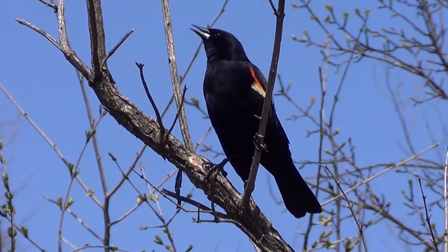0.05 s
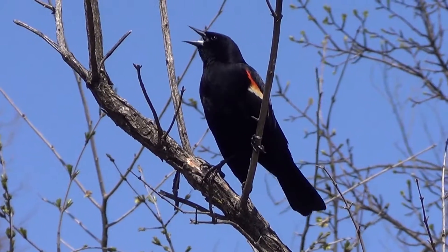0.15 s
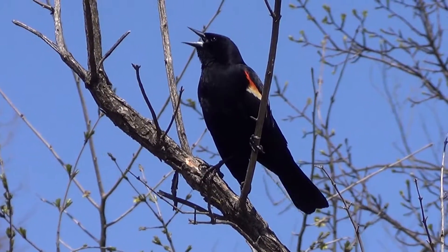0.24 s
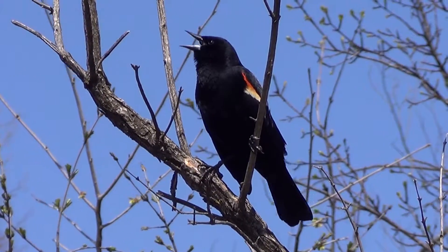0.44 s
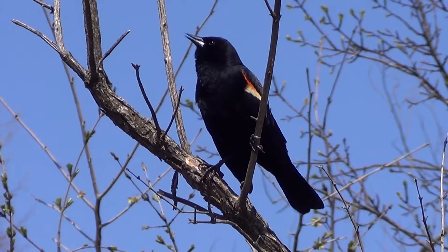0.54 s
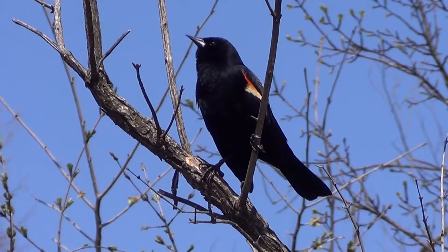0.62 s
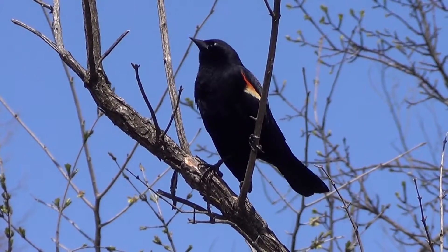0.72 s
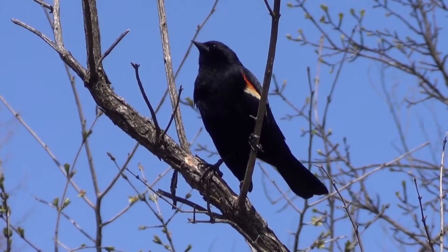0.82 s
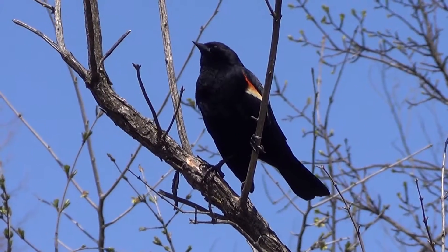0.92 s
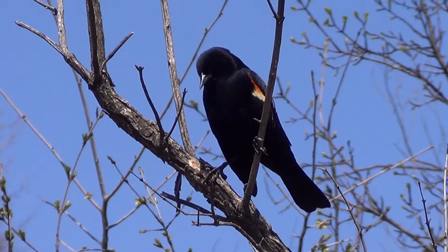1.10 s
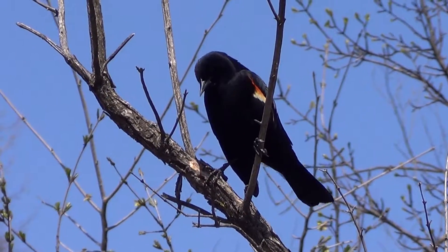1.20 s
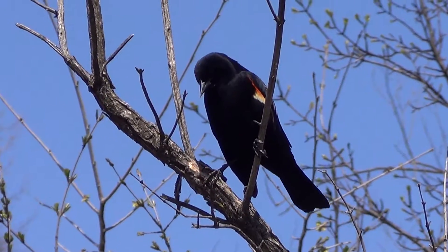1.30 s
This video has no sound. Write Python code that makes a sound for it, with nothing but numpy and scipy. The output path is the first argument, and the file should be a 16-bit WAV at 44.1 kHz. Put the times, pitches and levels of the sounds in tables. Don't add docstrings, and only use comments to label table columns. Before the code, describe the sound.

A faint far bird whistle fades over quiet wind and distant traffic hum. At about 0.17 seconds a close blackbird calls loudly: a very high, buzzing note swoops down, then at 0.32 a lower note starts rough, falls, and clears into a bright, slightly rising whistle ending near 0.58. A short echo lingers among trees; from 0.9 to 1.35 faint distant birds peep, trill and whistle.

```python
import sys
import numpy as np
from scipy import signal
from scipy.io import wavfile
from scipy.ndimage import uniform_filter1d

SR = 44100
rng = np.random.default_rng(int(sys.argv[2]) if len(sys.argv) > 2 else 0)


def ratio_of_db(decibels):
    return 10 ** (np.asarray(decibels, float) / 20)


def generate_wav(sig):
    pcm = np.round(np.clip(np.atleast_2d(sig).T, -1, 1) * 32767).astype(np.int16)
    wavfile.write(sys.argv[1], SR, pcm)


N = 59535


def evened(x):
    return x / np.sqrt(np.mean(x ** 2) + 1e-20)


def sine(hz):
    return np.sqrt(2) * np.sin(2 * np.pi * np.cumsum(hz * np.ones(N)) / SR)


def fuzzy(hz, width):
    r = np.exp(-np.pi * width / SR)
    z = rng.standard_normal(N) + 1j * rng.standard_normal(N)
    for _ in range(2):
        z = signal.lfilter([1], [1, -r], z)
    carrier = np.exp(2j * np.pi * np.cumsum(hz * np.ones(N)) / SR)
    return evened((z * carrier).real)


def read(points, hz):
    f, value = np.transpose(points)
    return np.interp(np.log(hz + 1), np.log(f + 1), value)


# (frequency [Hz], level [dB per Hz])
AIR_SPECTRUM = [(25, -33), (75, -5.5), (200, 0.5), (300, -4), (850, 0), (2000, -8.5), (3000, -16),
                (6500, -25), (15000, -32.5)]
# (frequency [Hz], correlation [0-1])
LIKENESS = [(60, 0.96), (180, 1), (550, 0.89), (1650, 0.69), (4970, 0.5), (15000, 1)]


def air():
    wash_db, whine_hz, whine_db = -39.5, 15734, -61
    hum_hz, hum_width_hz, hum_db, hum_steady = 119.8, 17, -56, 2.53
    frames, hz = N // 256 + 5, np.fft.rfftfreq(1024, 1 / SR)
    a, b, c, d, patches = rng.standard_normal((frames, 513, 5)).T
    patches = evened(uniform_filter1d(uniform_filter1d(patches, 10, 0), 12, 1))
    same = np.clip(read(LIKENESS, hz), -1, 1)[:, None]
    left = a + 1j * b
    right = same * left + np.sqrt(1 - same ** 2) * (c + 1j * d)
    z = np.array([left, right]) * ratio_of_db(read(AIR_SPECTRUM, hz)[:, None] + patches)
    wash = ratio_of_db(wash_db) * evened(signal.istft(z, nperseg=1024, noverlap=768)[1][:, :N])
    t = np.arange(N) / SR
    whine = ratio_of_db(whine_db) * np.sqrt(2) * np.sin(2 * np.pi * whine_hz * t)
    steady_hum = hum_steady * np.sin(2 * np.pi * hum_hz * t)
    hum = ratio_of_db(hum_db) * (fuzzy(hum_hz, hum_width_hz) + steady_hum)
    return wash + hum + whine


# (start [s], length [s], pitch [Hz], glide [Hz])
FAR_BIRDS = [
    (0, .32, 4785, -30),
    (1.13, .078, 3370, 0),
    (1.062, .1, 6680, 0),
    (.945, .045, 2750, -100),
    (1.0, .35, 2830, 0),
    (.91, .05, 5150, 0),
    (.94, .04, 3700, 0),
]
FAR_BIRD_LEVELS = [-50.5, -53, -68, -57, -64, -65, -68]
# (centre [s], half length [s], pitch [Hz], width [Hz])
FAR_TRILL = (.95, .045, 3700, 3200)


def distant():
    fade_db, blur_hz, trill_db = -18, 40, -49.5
    t, out = np.arange(N) / SR, np.zeros((2, N))
    for (start, length, pitch, glide), db in zip(FAR_BIRDS, FAR_BIRD_LEVELS):
        u = np.clip((t - start) / length, 0, 1)
        sounding = start == 0
        edges = np.clip(np.minimum(u + sounding, 1 - u) * 8, 0, 1)
        shape = edges * ratio_of_db(db + fade_db * u * sounding)
        hz = pitch + glide * u
        both, clear = fuzzy(hz, blur_hz), sine(hz)
        out += shape * np.array([clear + 1.05 * both, clear + 0.67 * fuzzy(hz, blur_hz)])
    centre, half, hz, width = FAR_TRILL
    return out + ratio_of_db(trill_db) * np.exp(-((t - centre) / half) ** 2) * fuzzy(hz, width)


def drift(size):
    return evened(uniform_filter1d(uniform_filter1d(rng.standard_normal(N), size), size))


def whistle(curve, flutter):
    jitter_hz, shimmer_db = 25, 1.41
    t, (s, *columns) = np.arange(N) / SR, np.transpose(curve)
    hz, level_db, depth, second_db, third_db = (np.interp(t, s, c) for c in columns)
    top, rate, slowing, swing, lead = flutter
    beat = 2 * np.pi * (rate * (t - top) - slowing * (t - top) ** 2 / 2)
    shake = np.cos(beat) + 0.32 * np.sin(2 * beat)
    jitter = jitter_hz * depth / 300 * drift(size=60)
    phase = 2 * np.pi * np.cumsum(hz + depth * shake + jitter) / SR
    throb = 1 + np.clip(swing * depth, 0, .95) * np.cos(beat + lead)
    tone = np.sin(phase)
    for k, db in ((2, second_db), (3, third_db)):
        tone += ratio_of_db(db) * np.sin(k * phase) * (k * hz < 19000)
    shimmer = shimmer_db * drift(size=200) + depth / 250 * drift(size=50)
    return np.sqrt(2) * tone * throb * ratio_of_db(level_db + shimmer) * (t > s[0]) * (t < s[-1])


# (time [s], pitch [Hz], level [dB], flutter depth [Hz], second partial [dB], third partial [dB])
HIGH_CURVE = [
    (.168, 9530, -52, 450, -33, -60),
    (.184, 8730, -35.5, 494, -32.5, -60),
    (.202, 7770, -19.5, 550, -37.5, -60),
    (.230, 6960, -17.5, 420, -30.5, -60),
    (.254, 6650, -13.5, 200, -22.5, -61.5),
    (.284, 6603, -13, 220, -17.5, -60),
    (.291, 6550, -22, 220, -7.5, -60),
    (.310, 6650, -14, 300, -33, -60),
    (.322, 6800, -40, 350, -26, -60),
]
# (one pitch top [s], rate [Hz], slowing [Hz/s], loudness swing [per Hz], lead [rad])
HIGH_BEAT = (.2205, 287, 350, .0007, 1.2)


def high_note():
    return whistle(HIGH_CURVE, HIGH_BEAT)


# (time [s], pitch [Hz], level [dB], flutter depth [Hz], second [dB], third partial [dB])
LOW_BUZZ = [
    (.312, 5300, -51.5, 549, -15, -22.5),
    (.322, 5100, -24.5, 508, -9, -26),
    (.338, 4760, -15, 430, -13, -23),
    (.372, 4463, -12, 258, -10.5, -18),
    (.399, 4325, -9, 90, -14, -10),
]
LOW_CLEAR = [
    (.405, 4327, -12, 5, -38, -15),
    (.438, 4360, -9, 5, -12, -5.5),
    (.468, 4386, -11.5, 5, -9.5, -6),
    (.478, 4414, -4.5, 5, -21, -24),
    (.520, 4443, -7, 5, -38.5, -19.5),
    (.540, 4494, -9.5, 5, -29, -33),
    (.568, 4490, -28, 5, -31, -28),
    (.59, 4540, -60, 5, -32, -30),
]
# (one pitch top [s], rate [Hz], slowing [Hz/s], loudness swing [per Hz], lead [rad])
LOW_BEAT = (.3537, 194, 5, 0.0016, 1.86)


def low_note():
    return whistle(LOW_BUZZ + LOW_CLEAR, LOW_BEAT)


# (multiple of pitch, centre [s], half length [s], width [Hz], level [dB])
RASP_BANDS = [
    (1.5, 0.334, 0.025, 1400, -31),
    (2.5, 0.424, 0.058, 1200, -46.5),
]


def rasp():
    t, (s, pitch) = np.arange(N) / SR, np.transpose(LOW_BUZZ + LOW_CLEAR)[:2]
    hz, out = np.interp(t, s, pitch), np.zeros(N)
    for multiple, centre, half, width, db in RASP_BANDS:
        out += ratio_of_db(db) * np.exp(-((t - centre) / half) ** 2) * fuzzy(multiple * hz, width)
    return out


# (delay [s], left level [dB], right level [dB])
NEAR_ECHOES = [
    (.0021, -21, -26.5),
    (.0046, -14, -13.5),
    (.0083, -7, -15),
    (0.0134, -21.5, -32),
    (.021, -19.5, -17.5),
]


def trees(x):
    leaf_hz = 5560
    taps, t = np.zeros((2, SR)), np.arange(SR) / SR
    at = np.arange(400, SR - 20, 20) + rng.integers(0, 20, (2, (SR - 401) // 20))
    np.put_along_axis(taps, at, rng.choice([-1., 1.], at.shape), 1)
    out = np.zeros((2, SR))
    for db, t60 in ((-17, .35), (-36, 2)):
        tail = taps * ratio_of_db(-60 * t / t60)
        out += ratio_of_db(db) * tail / np.linalg.norm(tail[0])
    out = signal.sosfilt(signal.butter(4, leaf_hz, fs=SR, output='sos'), out)
    out[:, 0] = 1
    for delay, left_db, right_db in NEAR_ECHOES:
        out[:, round(delay * SR)] += ratio_of_db(np.array([left_db, right_db]))
    return signal.fftconvolve(x[None], out, axes=1)[:, :N]


def scene():
    bird = high_note() + low_note() + rasp()
    return trees(bird) + distant() + air()


def low_pass(x):
    return signal.sosfilt(signal.butter(12, 15880, fs=SR, output="sos"), x)


def record(dry):
    knee_db, squeeze, fall_s, recover_db_per_s = -20, 0.4, 0.042, 5
    span = round(fall_s * SR)
    power = uniform_filter1d((dry ** 2).mean(0), span, origin=span // 2 - 1)
    power_db = 10 * np.log10(abs(power) + 1e-12)
    cut_db = squeeze * np.maximum(power_db - knee_db, 0)
    rise = np.arange(N) * recover_db_per_s / SR
    held_cut_db = np.maximum.accumulate(cut_db + rise) - rise
    return low_pass(dry / ratio_of_db(held_cut_db))


dry = scene()
out = record(dry)
generate_wav(out)
```